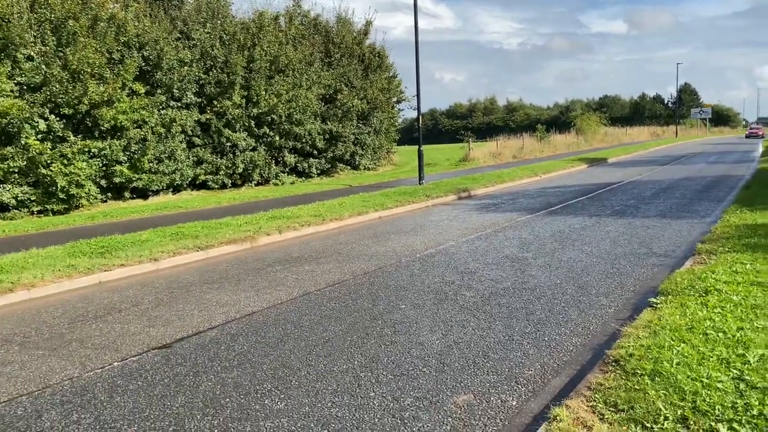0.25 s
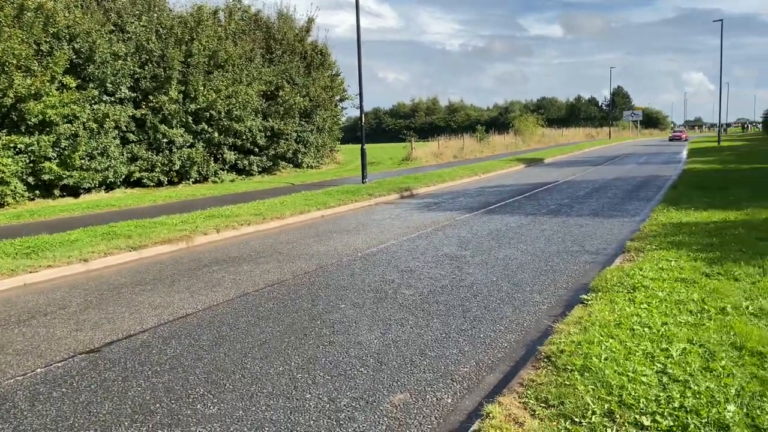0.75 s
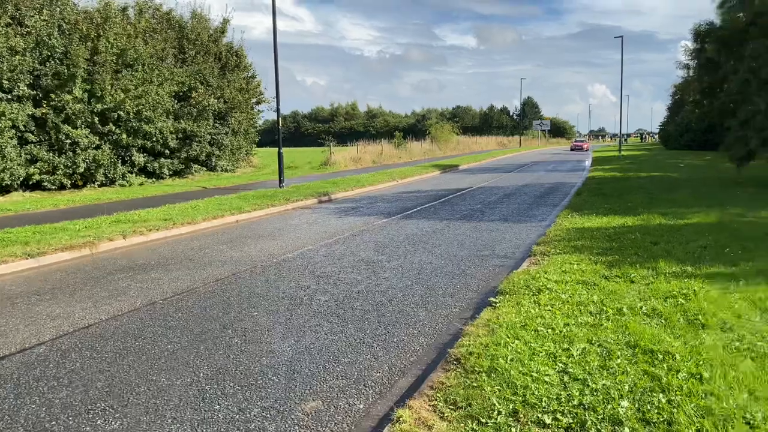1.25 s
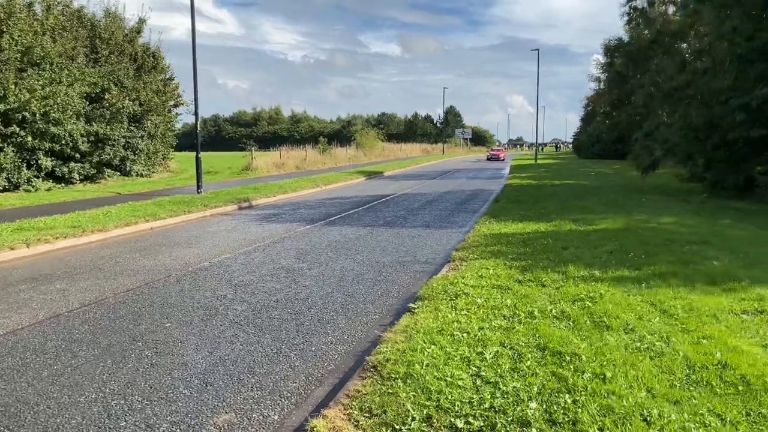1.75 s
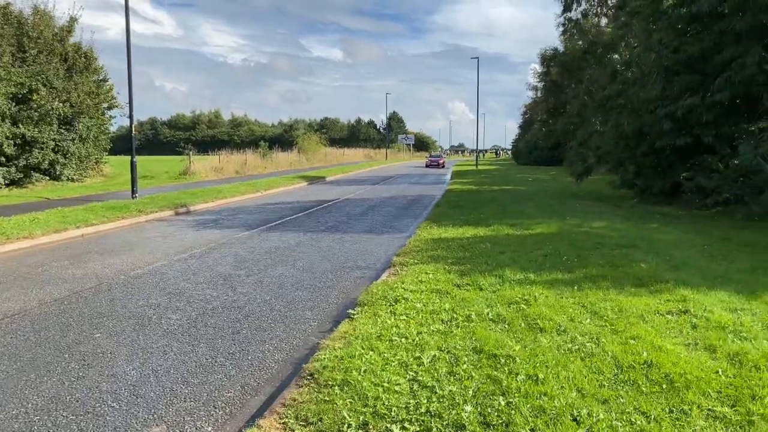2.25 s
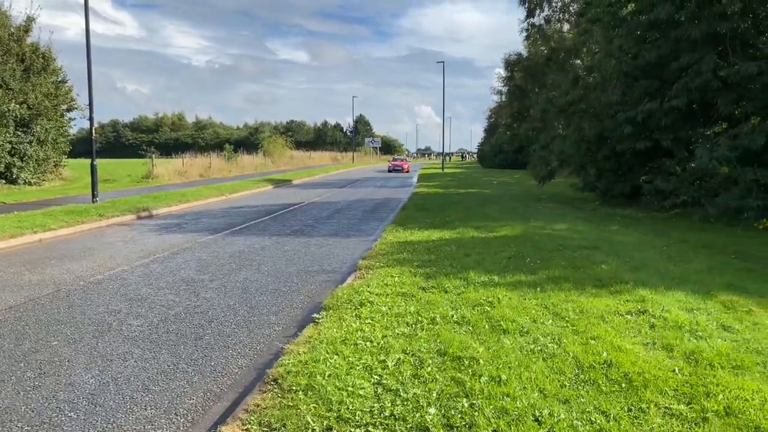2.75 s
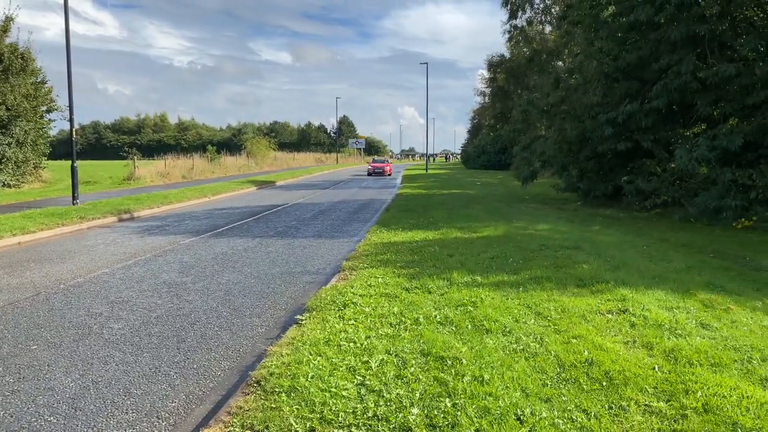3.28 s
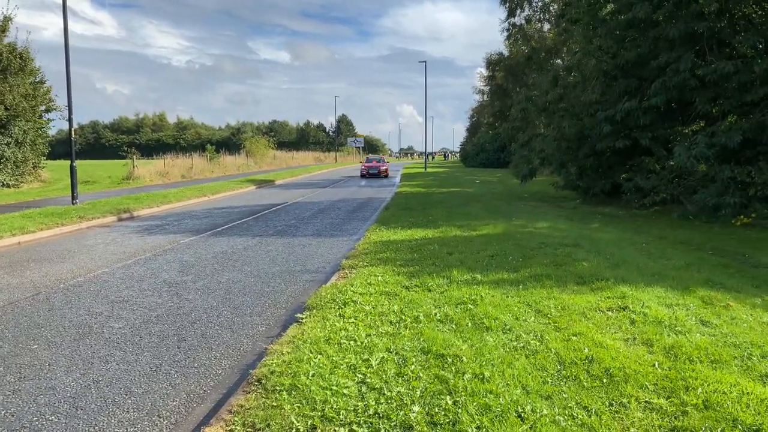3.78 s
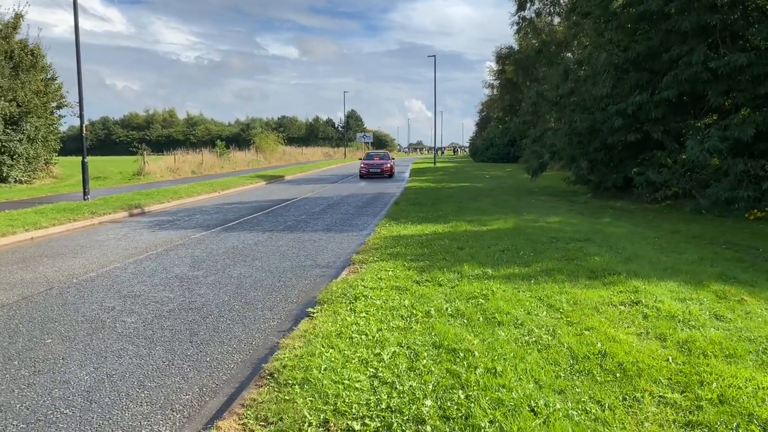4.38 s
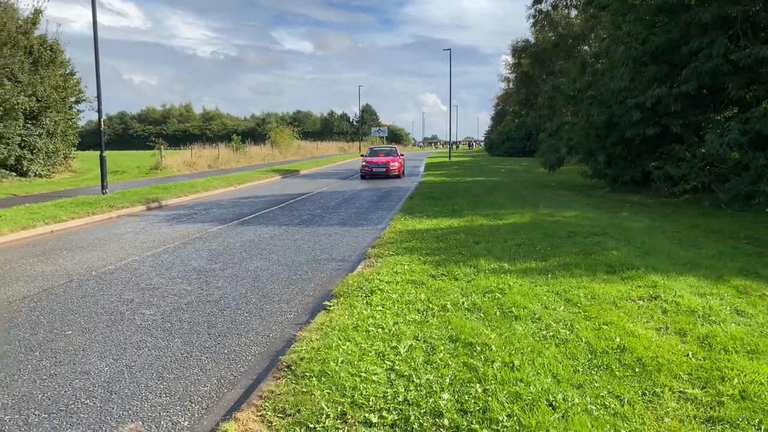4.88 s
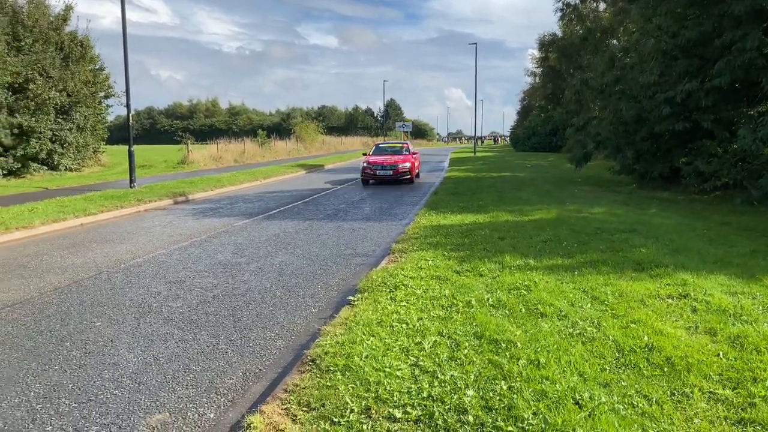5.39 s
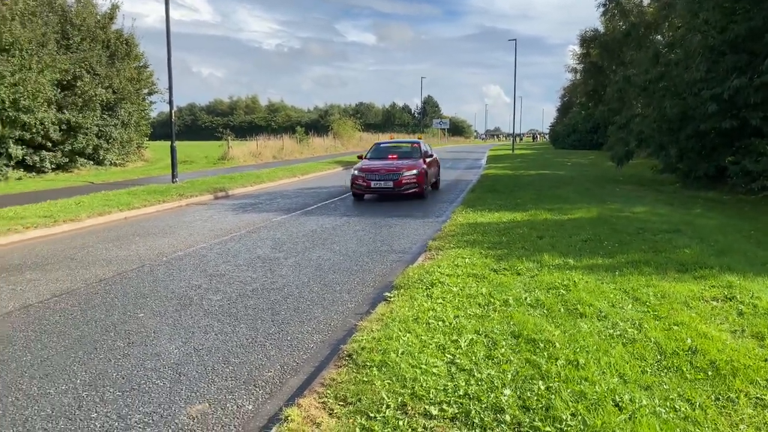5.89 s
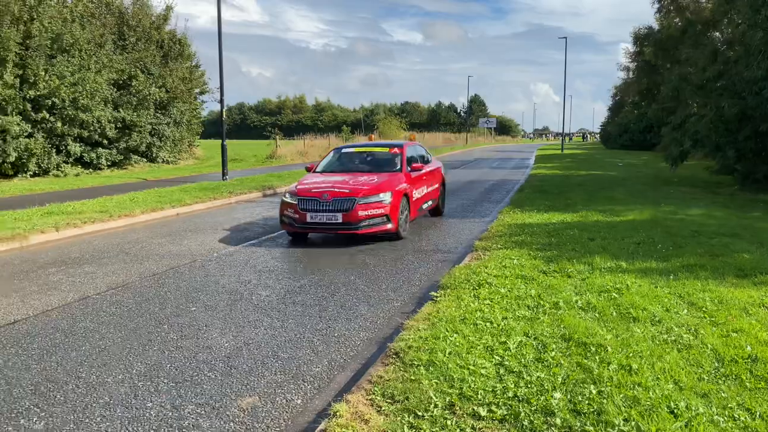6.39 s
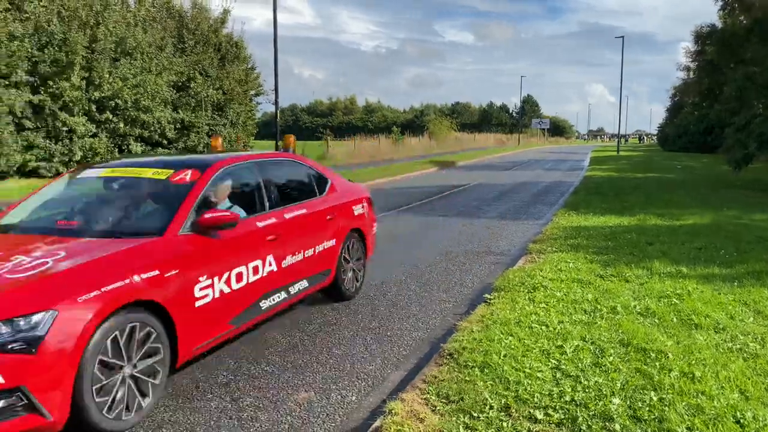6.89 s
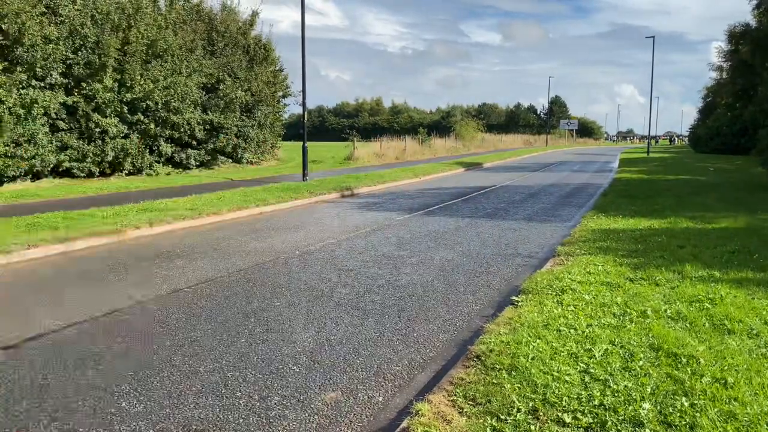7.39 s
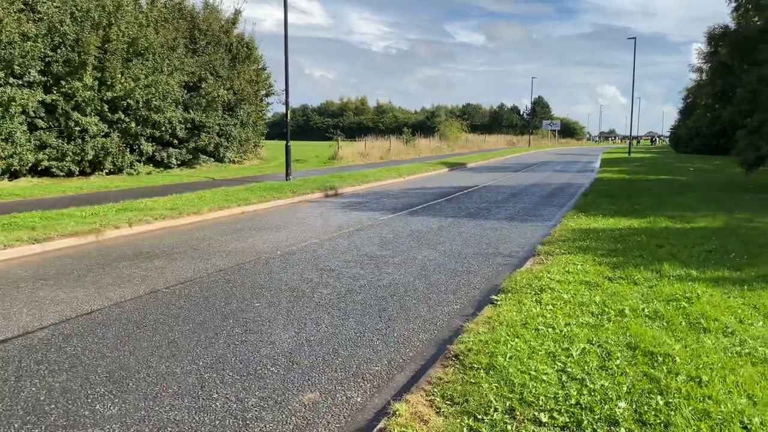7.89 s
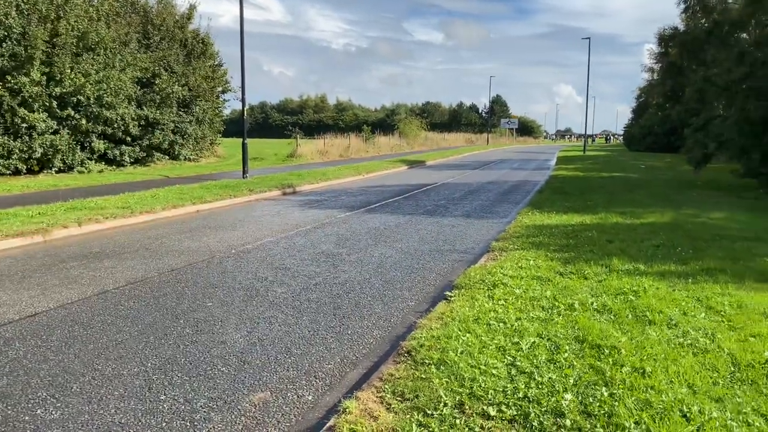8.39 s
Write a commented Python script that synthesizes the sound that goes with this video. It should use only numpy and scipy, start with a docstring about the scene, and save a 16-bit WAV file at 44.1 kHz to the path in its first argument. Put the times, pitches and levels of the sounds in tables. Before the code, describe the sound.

A widened stereo pair beside a damp road hears a low motorcycle exhaust pull away and climb in pitch, drop at a gear change, then drone on distantly with muffled pops. Small metallic clinks and rustles occur near the microphones. A car approaches with swelling tyre roar, sweeps by very close, trails sizzling water and grit clicks, and leaves faint far traffic and leaves.

```python
"""Grass verge of a damp road, heard through a closely spaced, widened microphone pair.
A motorcycle that has just gone by pulls away, changes up a gear and fades: firing pulses through a
silencer, with exhaust pops as filtered clicks, a tree-line echo and tyre hiss of shaped noise.
A car comes the other way and sweeps past close by: beamed noises of tyres and spray, and ringing grit.
Behind them are far tyres, metal clinks, rustles, distant traffic and leaves."""
import sys
import numpy as np
from scipy import signal
from scipy.fft import rfft, irfft, next_fast_len
from scipy.io import wavfile

SR = 44100
rng = np.random.default_rng(int(sys.argv[2]) if len(sys.argv) > 2 else 0)


def store_pcm(level_fs):
    """Save levels as 16-bit WAV."""
    pcm = np.round(np.clip(level_fs, -1, 1) * 32767).astype(np.int16)
    wavfile.write(sys.argv[1], SR, np.atleast_2d(pcm).T)


N = 381448
TIME = np.arange(N) / SR
SIZE = next_fast_len(N + SR // 2, real=True)
FREQS = np.maximum(np.arange(SIZE // 2 + 1) * SR / SIZE, 1)
LOG_FREQS = np.log(FREQS)

# Sizzle from the rear of a wet tread. Each row: frequency in Hz, relative density in dB per Hz.
SIZZLE_SPECTRUM = [(1000, -16), (1700, 2), (2300, 0.5), (2750, -2), (3200, -8), (6000, -38)]
# Fine mist. Each row: frequency in Hz, relative density in dB per Hz.
MIST_SPECTRUM = [(5000, -17), (8000, -14), (9800, 10.5), (12000, -3.5), (14000, 8.5), (16000, -13)]


def motorcycle():
    """Exhaust, pops and tyre hiss; the farther it gets, the more comes by way of the trees."""
    # Bearing. Each row: time in seconds, lead of the left microphone in ms.
    bearing = [(0, 0.48), (1.2, 0.39), (2.1, 0.24), (4, 0.151), (8.65, 0.059)]
    # Hiss of tyres and chain. Each row: frequency in Hz, relative density in dB per Hz.
    hiss_spectrum = [(150, 11), (400, 3.5), (800, -2.5), (1400, -5), (2200, -4.5), (3300, -3.5), (4800, -7),
                     (6300, -2.5), (8200, -16.5), (10000, -30), (15000, -59)]
    # Level of that hiss. Each row: time in seconds, level in dB.
    hiss_level = [(0, -47), (1.3, -41.5), (3, -45), (4, -62.5), (8.65, -51)]
    start_m, speed_m_per_s, gain_m_per_s2 = 11.7, 5, 2

    gone_m = speed_m_per_s * TIME + gain_m_per_s2 * TIME ** 2 / 2
    doublings = np.log2(1 + gone_m / start_m)   # of the starting distance
    lead_ms, = in_time(bearing)
    hiss_db, = in_time(hiss_level)

    pipe = exhaust()
    pops = backfires()
    echo_db = -28 + 5.5 * doublings
    to_trees = pipe * from_db(echo_db) + from_db(-8.5) * pops
    echo = trees(to_trees, t60_s=0.84, apart=0.35)

    layers = [(hiss_spectrum, hiss_db, .6),
              (SIZZLE_SPECTRUM, -44 - 23 * doublings, .8),
              (MIST_SPECTRUM, -56 - 11 * doublings, .3)]
    return arrive(pipe + pops, lead_ms) + echo + road_noise(layers, lead_ms, scatter_db=-19.5)


def exhaust():
    """A pressure pulse per firing, sharper under load, through the silencer, with a puff of gas."""
    # The engine pulls, changes up, pulls again. Each row: time in seconds, firings per second.
    engine = [(0, 29.2), (.26, 32.2), (.55, 34.5), (.82, 38), (1, 41.8), (1.3, 44.7), (1.83, 54.6),
              (2.55, 72), (3.28, 82.7), (3.48, 71.3), (3.68, 59.6), (4.3, 66.7), (5.1, 74), (5.9, 81),
              (7, 90.3), (8.65, 87.4)]
    # Hard pull, eased after the first pop, closed for the gear change, then gentle.
    # Each row: time in seconds, pulse level in dB, sharpness in dB per octave, gas rush in dB.
    throttle = [(0, -6.5, 6, -28), (.8, -1.5, 4, -35), (1.3, 4, 3.05, -36), (1.65, -2, 6.5, -30),
                (1.95, -.5, 7, -40), (2.5, 0.5, 6.5, -39), (2.6, 4.5, 4.5, -38), (3.25, 6.5, 2.5, -35),
                (3.55, -1.5, 1.5, -36.5), (3.8, -6.5, 7, -37), (4.5, -3.5, 4, -37.5), (5.1, -3.5, 4.5, -37),
                (5.9, -0.5, 2.5, -33), (6.5, -2, 3.5, -40), (7.9, -5, 1.5, -34), (8.65, -3, 4.5, -36)]
    # Shape of a firing. Each row: multiple of the firing rate, level in dB.
    firing = [(1, 0.5), (2, -0.5), (3, 2.5), (4, 2.5), (5, -1), (6, 1), (7, 2), (8, -1.5), (9, 8),
              (10, 6.5), (11, 9), (12, 8), (13, 10), (14, 9), (15, 11.5), (16, 12), (17, 14.5), (18, 18)]
    # Silencer response. Each row: frequency in Hz, gain in dB.
    silencer = [(20, -62), (28, -36), (37, -36), (45, -28.5), (56, -25.5), (70, -27), (85, -32), (105, -30),
                (130, -30.5), (165, -41), (200, -46), (235, -58.5), (270, -57), (300, -69.5), (370, -76),
                (420, -70.5), (490, -84.5), (560, -102), (700, -125), (4000, -180)]
    # Silencer chambers. Each row: frequency in Hz, width in Hz.
    chamber_rows = [(88, 16), (130, 120)]
    # Gas rush. Each row: frequency in Hz, relative density in dB per Hz.
    puff_spectrum = [(22, -40), (45, 1), (70, 7), (130, 1), (200, -6.5), (260, -11), (330, -26), (430, -14),
                     (600, -50.5)]
    # The engine stumbles after its loudest pop: time in seconds, length in seconds, loss in dB.
    stumble_s, stumble_length_s, stumble_db = (4.15, 0.026, 7.7)

    firing_hz, = in_time(engine)
    level_db, sharp_db, puff_db = in_time(throttle)
    uneven_db = .5 + .2 * TIME   # firings grow more uneven as the motorcycle gets farther
    turns = np.cumsum(firing_hz * (1 + .002 * uneven_db * drift(40))) / SR   # counted in firings
    firing_draw = rng.standard_normal(size=1000)[np.round(turns).astype(int)]
    strength = from_db(uneven_db * firing_draw)

    pulses = np.zeros(N)
    for k, db in firing:
        waver_db = .3 * TIME * drift(7)   # moving air, felt more from farther off
        amplitude = np.sqrt(2) * from_db(db + sharp_db * np.log2(k) + waver_db)
        pulses += amplitude * np.cos(2 * np.pi * round(k) * turns)
    pulses *= strength * from_db(level_db - stumble_db * bump(stumble_s, stumble_length_s))

    gas = rng.standard_normal(N) * np.exp(-2 * (turns % 1))   # dies away after each firing
    puffs = rms_one(filtered(gas, response(puff_spectrum)))
    return filtered(pulses, response(silencer) * chambers(chamber_rows)) + from_db(puff_db) * puffs


def backfires():
    """Unburnt fuel goes off in the pipe: one big pulse that the silencer draws out into a falling thud."""
    # Each row: time in seconds, peak in dB.
    pops = [(2.532, -16.5), (2.828, -24), (3.385, -26), (3.657, -16.5), (3.668, -24), (4.075, -22),
            (4.105, -14.5), (4.332, -21), (4.484, -22), (4.79, -22.5), (5.129, -25), (7.48, -27),
            (7.79, -28), (8.187, -19.5), (8.256, -25), (8.541, -23)]
    # Silencer as a strong blast meets it, more damped. Each row: frequency in Hz, width in Hz.
    pop_chamber = [(85, 81)]
    # Passband of the thud: low edge in Hz, high edge in Hz.
    band_hz = (48.5, 181)

    band = signal.butter(3, band_hz, "band", fs=SR, output="sos")
    pulse = signal.sosfilt(band, signal.unit_impulse(SR // 4))
    thud = filtered(pulse, chambers(pop_chamber))
    s, peak_db = np.transpose(pops)
    clicks = np.zeros(N)
    clicks[(s * SR).astype(int)] = from_db(peak_db)
    return filtered(clicks, rfft(thud / np.abs(thud).max(), SIZE))


def chambers(table):
    """Each chamber delays the notes near its own pitch (all-pass), so a pulse ends in a low swing."""
    resonance = np.prod([hz ** 2 - FREQS ** 2 + 1j * FREQS * width_hz for hz, width_hz in table], axis=0)
    return np.conj(resonance) / resonance


def trees(x, t60_s, apart):
    """Diffuse echo from the tree line: decaying noise, slightly different at each microphone."""
    age_s = TIME[:SR]
    decay = np.exp(-np.log(1000) * age_s / t60_s) * (age_s > .02)
    common, own = rng.standard_normal((2, SR)) * decay
    tail = common + apart * own * np.array([[1], [-1]])
    return filtered(x, rfft(tail / np.sqrt(np.sum(common ** 2)), SIZE))


def car():
    """Tyres roar from afar; rumble and spray only carry from close by. Sizzle, mist and grit trail behind."""
    # Bearing. Each row: time in seconds, lead of the left microphone in ms.
    bearing = [(0, 0.0092), (6.9, 0.017), (7.1, 0.067), (7.28, 0.33), (7.48, 0.48), (7.68, 0.38),
               (8.65, 0.26)]
    # Scattered share, high from afar and alongside, low from behind.
    # Each row: time in seconds, level in dB.
    scatter_level = [(0, 7.5), (5, 0), (6.4, -7.5), (6.85, -3.5), (7.12, -2), (7.28, -1.5), (7.45, -7.5),
                     (8.65, -3.5)]
    # Tyre roar, body rumble, tread rush, spray. Each row: frequency in Hz, relative density in dB per Hz.
    roar_spectrum = [(300, -32), (540, -12), (660, -0.5), (780, 3.5), (880, 3.5), (1050, -5.5),
                     (1400, -20.5), (2500, -64)]
    rumble_spectrum = [(30, -30), (70, -3), (130, -4.5), (250, 0.5), (350, -7), (500, -8.5), (700, -12.5),
                       (1500, -58)]
    rush_spectrum = [(600, -14), (1000, 3), (1350, 3), (1850, -1.5), (2400, -9.5), (3300, -16.5),
                     (5000, -21.5), (9000, -67)]
    spray_spectrum = [(1500, -26), (2800, 7.5), (4200, -8.5), (6300, 6), (8300, -5.5), (10000, -27),
                      (15000, -35)]
    # Radiation. Each: level abreast in dB, gain ahead in dB, gain behind in dB, narrowness of the
    # rear beam (sign ignored), loss over the grass in dB per m, place along the car in m.
    roar_beam = (-20, 2.17, -15.5, 4.5, 0.21, -0.93)
    rumble_beam = (-20.5, 3, -35, 8, 0.4, 0.32)
    rush_beam = (-31.5, 9.5, 6, 1.2, 0.1251, -1.5)
    spray_beam = (-51.5, 12, 18, -1.5, 0.63, 1.5)
    sizzle_beam = (-36.5, 10.5, -30, 3.5, 1.23, 1.8)
    mist_beam = (-45, 7, -7, 12, 1, 1)
    # Rear treads fling water: time in seconds, length in seconds, extra sizzle in dB.
    fling_s, fling_length_s, fling_db = (7.47, 0.12, 7.8)
    # The wedge between front tread and road beams the roar at the verge:
    # time in seconds, length in seconds, extra level in dB.
    horn_s, horn_length_s, horn_db = (6.8, 0.08, 1.9)
    # Grit flicked up by the tyres. Each row: time in seconds, level in dB.
    grit_hits = [(6.7232, -37), (7.583, -38), (7.6374, -32.5), (7.7088, -32), (7.8593, -37), (8.255, -41),
                 (8.5879, -35.5)]
    # Ringing of a grain. Each row: frequency in Hz, level in dB, T60 in seconds.
    grit_modes = [(4720, -19, .008), (5840, 3, 0.011), (6967, -1, 0.0086)]

    lead_ms, = in_time(bearing)
    scatter_db, = in_time(scatter_level)
    swell_db = horn_db * bump(horn_s, horn_length_s)
    sizzle_db = passing_db(sizzle_beam) + fling_db * bump(fling_s, fling_length_s)
    layers = [(roar_spectrum, passing_db(roar_beam) + swell_db, 1.2),
              (rumble_spectrum, passing_db(rumble_beam) + swell_db / 2, .9),
              (rush_spectrum, passing_db(rush_beam), .9),
              (spray_spectrum, passing_db(spray_beam), 1.2),
              (SIZZLE_SPECTRUM, sizzle_db, 1.1),
              (MIST_SPECTRUM, passing_db(mist_beam), 1.1)]
    grit = strike(grit_hits, grit_modes, spread_db=2.5)

    left_db = 1.5 * bump(7.58, .49)   # left over right, just after the car is abreast
    balance = from_db([left_db / 2, -left_db / 2])
    return road_noise(layers, lead_ms, scatter_db) * balance + arrive(grit, lead_ms)


def passing_db(beam):
    """Level of one car noise: spreading with distance, loss over the grass, beaming along the road."""
    abreast_s, speed_m_per_s, miss_m = 7.02, 11.8, 3.75
    abreast_db, ahead_db, behind_db, narrowness, loss_db_per_m, place_m = beam
    along_m = speed_m_per_s * (TIME - abreast_s) - place_m
    distance_m = np.hypot(along_m, miss_m)
    end_on = (along_m / distance_m) ** 2
    beam_db = np.where(along_m < 0, ahead_db * end_on, behind_db * end_on ** abs(narrowness))
    spreading_db = 20 * np.log10(distance_m / miss_m)
    return abreast_db + beam_db - spreading_db - loss_db_per_m * distance_m


def road_noise(layers, lead_ms, scatter_db):
    """A vehicle's noises (spectrum, dB, flicker dB), heard directly and scattered off the hedges."""
    # Scattered share. Each row: frequency in Hz, gain in dB before scatter_db.
    scatter = [(100, -31), (400, -14), (800, -17.5), (1400, 1), (5000, 5)]
    cloud_hz = 7450

    total = np.zeros((3, N))
    for spectrum, db, flicker_db in layers:
        total += from_db(db + flicker_db * drift(30)) * noise(spectrum, channels=3)
    direct, around = total[0], total[1:]
    spread = 1 / (1 + (cloud_hz / FREQS) ** 8)
    aimed = arrive(filtered(direct, np.sqrt(1 - spread)), lead_ms)
    cloud = filtered(around, np.sqrt(spread))   # top treble, from a spread-out cloud of drops
    scattered = from_db(scatter_db) * filtered(around, response(scatter) * (1 - spread))
    return aimed + cloud + scattered


def far_tyres():
    """Tyres far up the road, ahead: a hum swells while the car is distant; more traffic rises later."""
    # Hum. Each row: frequency in Hz, relative density in dB per Hz.
    hum_spectrum = [(550, -26), (700, -3.5), (780, 2.5), (880, 3.5), (980, -2), (1150, -17), (1600, -9),
                    (2400, -46)]
    # Its swell: time in seconds, length in seconds, level in dB.
    hum_s, hum_length_s, hum_db = (3.6, 2.02, -45.5)
    # Later tyres. Each row: frequency in Hz, relative density in dB per Hz.
    later_spectrum = [(600, -20), (880, 5.5), (1080, -8), (1300, 5), (1600, -1), (1850, -2), (2100, -36),
                      (3000, -47)]
    # Their entry: start in seconds, rise time in seconds, level in dB.
    start_s, rise_s, level_db = (6.98, 0.28, -46)

    hum_gain = bump(hum_s, hum_length_s) * from_db(hum_db + drift(10))
    middle, sides = hum_gain * noise(hum_spectrum, channels=2)
    hum = middle + from_db(-13) * sides * np.array([[1], [-1]])
    rise = np.clip((TIME - start_s) / rise_s, 0, 1)
    later = rise * from_db(level_db + 0.92 * drift(10)) * noise(later_spectrum)
    return hum + later


def clinks():
    """A small metal thing rattles near the microphones: struck decaying modes."""
    # Each row: time in seconds, level in dB before the trim below.
    hits = [(4.961, -34), (4.985, -46), (5.16, -41), (5.66, -42)]
    # Ringing metal. Each row: frequency in Hz, level in dB, T60 in seconds.
    modes = [(2710, -5.5, 0.4), (4290, -7, 0.6), (4962, -6.5, 0.17), (5800, -15, 0.17), (6332, -11, 0.31),
             (7800, -20, .15), (8236, -19, .22), (9350, -18, .1), (9787, -23, .25)]
    return from_db(-5) * strike(hits, modes, spread_db=1.5)


def strike(events, modes, spread_db):
    """Each blow sets every mode, a two-pole resonator, ringing with a strength of its own."""
    s, event_db = np.transpose(events)
    out = np.zeros(N)
    for hz, mode_db, t60_s in modes:
        clicks = np.full(N, 1e-18)   # tiny floor keeps the filter out of denormals
        chance_db = spread_db * rng.standard_normal(len(s))
        clicks[(s * SR).astype(int)] = from_db(event_db + mode_db + chance_db)
        r = from_db(-60 / (t60_s * SR))   # decay per sample
        w = 2 * np.pi * hz / SR
        out += signal.lfilter([0, np.sin(w)], [1, -2 * r * np.cos(w), r * r], clicks)
    return out


def rustles():
    """Brief grainy swells of noise near the microphones."""
    # Each row: time in seconds, level in dB before the grain, length in seconds.
    swells = [(4.354, -49, 0.029), (4.429, -50.5, 0.01), (4.974, -51, 0.022), (5.159, -57, .015),
              (5.664, -58, .02)]
    # Each row: frequency in Hz, relative density in dB per Hz.
    colour = [(1500, -17), (2800, 8), (6500, 2), (9500, -11), (15000, -25)]
    swell = sum(from_db(db) * np.exp(-.5 * ((TIME - s) / length_s) ** 2) for s, db, length_s in swells)
    grain = from_db(5.25 * drift(510))
    return swell * grain * noise(colour, channels=2)


def distant_air():
    """Distant traffic and leaves: steady shaped noise, unrelated at the two microphones."""
    # Each row: frequency in Hz, relative density in dB per Hz.
    spectrum = [(25, -13), (55, 11.5), (150, 6.5), (300, 1.5), (550, -2.5), (900, -5), (1600, -17),
                (3200, -21), (6000, -14), (8500, -28.5), (10500, -21.5), (15000, -96)]
    return from_db(-42.5) * noise(spectrum, channels=2)


def from_db(db):
    """Amplitude factor of a level in dB."""
    return np.exp(np.asarray(db) * (np.log(10) / 20))


def rms_one(x):
    """Scale to an rms of 1."""
    return x / np.sqrt(np.mean(x ** 2) + 1e-20)


def in_time(rows):
    """Each column of a table as a curve over all samples."""
    s, *columns = np.transpose(rows)
    return [np.interp(TIME, s, c) for c in columns]


def response(points):
    """Gain at every frequency from a short (Hz, dB) table."""
    hz, db = np.transpose(points)
    return from_db(np.interp(LOG_FREQS, np.log(hz), db))


def filtered(x, gain):
    """Apply a frequency response by FFT."""
    return irfft(rfft(x, SIZE) * gain, SIZE)[..., :N]


def bump(centre_s, length_s):
    """A smooth swell of height 1."""
    return np.exp(-((TIME - centre_s) / length_s) ** 2)


def drift(rate_hz):
    """Slow chance of rms 1: random knots joined by lines."""
    knots = rng.standard_normal(int(rate_hz * N / SR) + 2)
    return rms_one(np.interp(TIME * rate_hz, np.arange(len(knots)), knots))


def noise(spectrum, channels=1):
    """Noises of one colour from one loop of rms 1; taken seconds apart, they are unrelated."""
    phases = np.exp(2j * np.pi * rng.random(len(FREQS)))
    loop = rms_one(irfft(response(spectrum) * phases, SIZE))
    return np.array([np.roll(loop, k * SIZE // channels)[:N] for k in range(channels)])


def arrive(x, lead_ms):
    """A sound from one side reaches the nearer microphone first; a positive lead is the left's."""
    return np.array([np.interp(TIME + side * lead_ms / 2000, TIME, x) for side in (1, -1)])


def scene():
    """Sum of all sources at the two microphones."""
    return motorcycle() + car() + far_tyres() + clinks() + rustles() + distant_air()


def record(dry):
    """The pair is reshaped in width, each side has its own colour, and the top is cut."""
    # Each row: frequency in Hz, side boost in dB.
    width = [(50, -1), (130, 8), (300, 8), (600, 12), (1000, 9), (1800, 1), (3000, 0), (15000, -2.5)]
    # Each row: frequency in Hz, left over right in dB.
    left_over_right = [(60, -1.4), (200, -1.3), (350, 0.9), (650, -0.5), (1200, 3), (2300, -0.5), (4200, 2),
                       (5900, 7), (7800, 0.5), (15000, -0.5)]
    mid = (dry[0] + dry[1]) / 2
    side = filtered((dry[0] - dry[1]) / 2, response(width))
    tilt = np.sqrt(response(left_over_right))   # half to each side
    pair = np.array([filtered(mid + side, tilt), filtered(mid - side, 1 / tilt)])
    top_cut = signal.cheby2(14, 70, 16000, fs=SR, output="sos")   # 70 dB down from 16 kHz
    return signal.sosfilt(top_cut, pair)


dry = scene()
out = record(dry)
store_pcm(out)
```